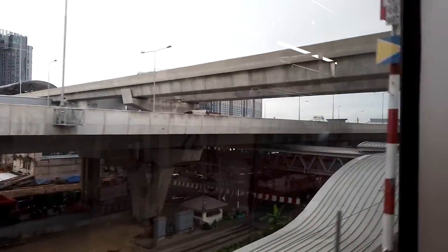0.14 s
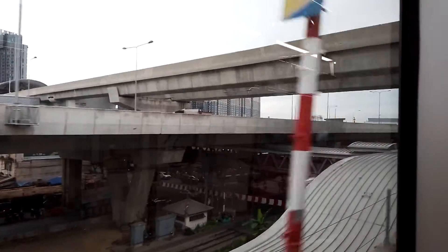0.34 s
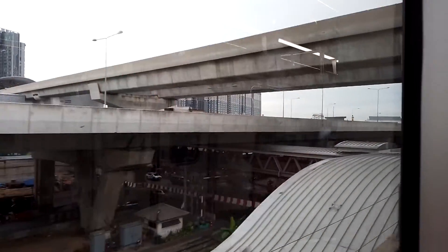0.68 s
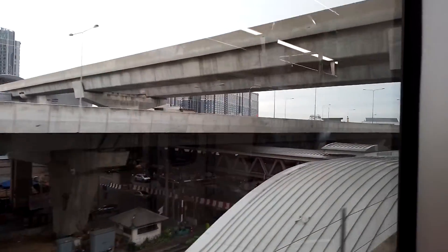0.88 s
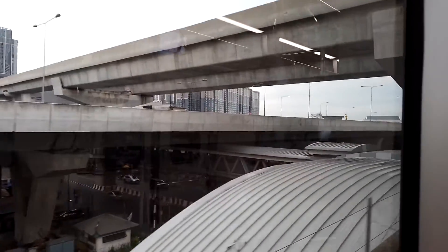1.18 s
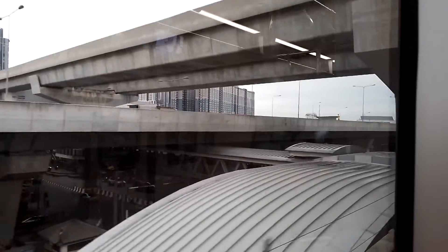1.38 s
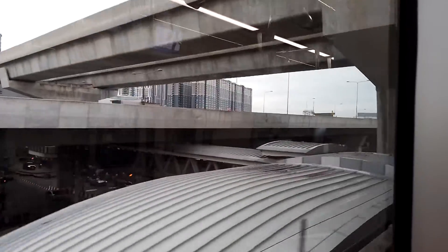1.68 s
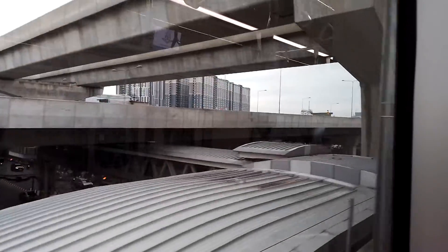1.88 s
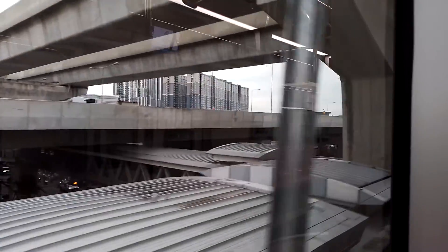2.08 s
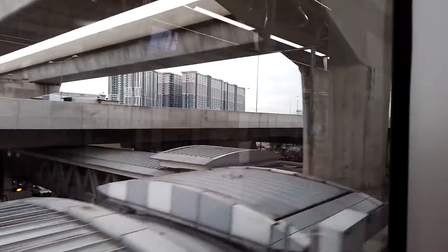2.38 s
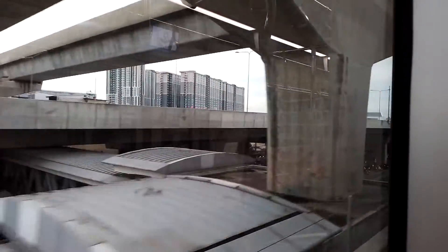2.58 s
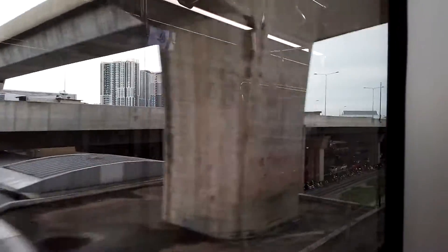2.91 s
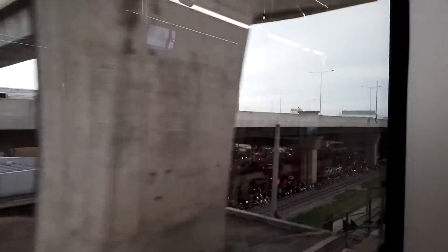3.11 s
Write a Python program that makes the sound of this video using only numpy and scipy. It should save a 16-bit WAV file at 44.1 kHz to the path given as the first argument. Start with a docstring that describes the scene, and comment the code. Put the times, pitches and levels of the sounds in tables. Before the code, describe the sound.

Electric commuter train rolls steadily, wheels roaring dully through the floor, with two air hisses.

```python
"""Wheels roar through the floor from the start: this is inside an electric commuter train on a viaduct. The body
booms, ventilation hisses and the traction gear whines faintly. Air valves blow off twice, first with a
whistle, then sharply; small leaks hiss and fittings tick. Nearly everything is shaped stereo noise under level
curves; only the valve seats ring as sines. The two microphone ports of a phone colour the treble differently."""
import sys
import numpy as np
from scipy import signal
from scipy.fft import rfft, irfft, next_fast_len
from scipy.io import wavfile
from scipy.ndimage import uniform_filter1d, map_coordinates

SR = 44100
rng = np.random.default_rng(int(sys.argv[2]) if len(sys.argv) > 2 else 0)


def undo_db(level):
    """Turn decibels back into plain size, where 20 dB means ten times bigger."""
    steps = np.asarray(level, float) / 20
    return 10 ** steps


def master(y):
    """Save y as 16-bit WAV."""
    cut = np.clip(np.atleast_2d(y).T, -1, 1)
    pcm = np.round(cut * 32767)  # scale
    wavfile.write(sys.argv[1], SR, pcm.astype(np.int16))


N = 143325  # samples, 3.25 s


def unit(x):
    """Scale so that the mean of the channels has rms 1."""
    return x / np.sqrt(np.mean(np.atleast_2d(x).mean(axis=0) ** 2) + 1e-20)


def along(points, hz):
    """Interpolate (Hz, value) points on a log frequency axis."""
    f, v = np.transpose(points)
    return np.interp(np.log(hz + 1), np.log(f + 1), v)


def curves(rows):
    """One value per sample for each column after the time."""
    s, *cols = np.transpose(rows)
    return [np.interp(np.arange(N) / SR, s, c) for c in cols]


def wobble(rate):
    """A smooth random curve with rate knots a second."""
    knots = rng.standard_normal(int(N * rate / SR) + 4)
    return map_coordinates(knots, [np.arange(N) * rate / SR])


def filtered(x, response):
    """Multiply the spectrum of x by a response of frequency."""
    m = next_fast_len(N + 8192)
    return irfft(rfft(x, m) * response(np.fft.rfftfreq(m, 1 / SR)), m)[..., :N]


def shape(spectrum):
    """Gain over frequency from (Hz, dB) points."""
    return lambda hz: undo_db(along(spectrum, hz))


def peaks(table):
    """Gain over frequency of steep resonances, from rows of (Hz, width Hz, dB)."""
    return lambda hz: sum(undo_db(db) / (1 + (2 * (hz - c) / w) ** 2) for c, w, db in table)


def rush(gain, patchy_db):
    """Stereo noise with patches of random gain in time and pitch, nearly the same in both channels in the bass."""
    # How alike left and right are. Each row: frequency in Hz, likeness from 0 to 1.
    alike = [(30, .9), (60, 0.96), (120, 1), (220, 0.85), (420, 0.71), (800, 0.24), (1500, 0.14),
             (11000, 0.13)]
    z = signal.stft(rng.standard_normal((2, N)), nperseg=1024)[2]
    field = rng.standard_normal(z.shape[1:])
    field = uniform_filter1d(field, size=5, axis=0)
    field = uniform_filter1d(field, size=6, axis=1)
    patches = undo_db(patchy_db * field / field.std())
    pair = signal.istft(z * patches, nperseg=1024)[1][:, :N]

    def mid_side_gain(hz):
        side_share = np.tan(np.arccos(np.clip(along(alike, hz), 0, 1)) / 2)
        return gain(hz) * [np.ones_like(hz), side_share]

    mid, side = filtered(pair, mid_side_gain)
    return unit(np.array([mid + side, mid - side]))


def blows(rows):
    """Envelope of air releases: rise, hold, then the carriage lets them die away."""
    t = np.arange(N) / SR
    out = 0
    for s, db, rise, hold, t60 in rows:
        fade_db = -60 * np.clip(t - s - rise - hold, 0, None) / t60
        out = out + undo_db(db + fade_db) * np.clip((t - s) / rise, 0, 1) ** 0.66
    return out


def ventilation():
    """Steady air hiss: broad noise with a slightly unsteady level."""
    # Hiss over time. Each row: time in seconds, level in dB.
    air = [(0.0, -61), (0.78, -61.5), (0.95, -61.5), (1.36, -62.5), (1.72, -61.5), (1.85, -59),
           (2.05, -59.5), (3.25, -58.5)]
    # Colour of the hiss. Each row: frequency in Hz, density in dB per Hz.
    vent = [(900, -27), (1200, -3.5), (1380, -8), (1500, -1.5), (1800, -8.5), (2050, -2.5), (2200, -2.5),
            (2580, -7.5), (2940, -7), (3230, -14), (3940, -13.5), (5430, -21.5), (6370, -17), (6870, -13),
            (7550, -9), (8620, -21), (9600, -19), (10600, -16), (11400, -20.5), (12200, -25), (12700, -33),
            (14200, -34), (15000, -120)]
    air_db, = curves(air)
    return undo_db(air_db + 0.5 * wobble(10)) * rush(shape(vent), patchy_db=1.9)


def gear_whine():
    """Wavering whine of the traction gear: a fuzzy line of narrow noise."""
    # Whine over time. Each row: time in seconds, level in dB before a cut of 2 dB.
    gears = [(0.0, -71), (0.02, -65.5), (0.76, -72), (0.84, -61), (1.21, -74), (1.32, -62), (1.35, -68),
             (1.61, -68), (1.74, -55), (2.27, -68), (2.62, -60), (3.25, -70)]
    # The fuzzy line. Each row: frequency in Hz, width in Hz, gain in dB.
    whine = [(2130, 126, 0)]
    whine_db, = curves(gears)
    return undo_db(whine_db - 2 + 0.57 * wobble(8.1)) * rush(peaks(whine), patchy_db=1.0)


def carriage_body():
    """The floor drums, the body booms and hums deep below: three low noise bands, each with its own level."""
    # Body over time. Each row: time in seconds, floor drumming in dB, body boom in dB, deep hum in dB.
    body = [(0.0, -45, -69, -71), (0.06, -46, -57, -55), (0.15, -47, -57, -65), (0.37, -51.5, -63, -61),
            (0.41, -48.5, -58, -72), (0.59, -44, -59, -49), (0.66, -36.5, -46, -60), (0.71, -42, -53, -66),
            (0.78, -47.5, -57, -54), (0.92, -41.5, -57, -59), (1.0, -47, -68, -56), (1.11, -39, -57, -63),
            (1.16, -41.5, -55, -53), (1.44, -47.5, -58.5, -67), (1.47, -51, -65, -60.5),
            (1.66, -52.5, -64, -69), (1.71, -46.5, -52, -51), (1.82, -53, -63, -72),
            (2.12, -51, -53.5, -62), (2.29, -49, -68, -71), (2.33, -53.5, -65, -62),
            (2.47, -44.5, -55.5, -61), (3.2, -52.5, -59.5, -64), (3.25, -45, -55, -62)]
    # Colours of drumming, boom and hum. Each row: frequency in Hz, density in dB per Hz.
    drum = [(97, -57), (165, -30), (210, -4), (231, 0), (264, 1), (307, -5.5), (350, -6.5), (460, -11),
            (770, -120)]
    boom = [(50, -29), (85, -3), (129, 2), (161, -13.5), (170, -24), (220, -51), (370, -120)]
    hum = [(12, -50), (20, -24), (38, -20), (52, -12), (63, -8), (70, 3.5), (78, -4.5), (90, -4.5),
           (120, -29), (200, -120)]
    drum_db, boom_db, hum_db = curves(body)
    return (undo_db(drum_db + 1.2 * wobble(15)) * rush(shape(drum), patchy_db=0.0)
            + undo_db(boom_db + 1.9 * wobble(15)) * rush(shape(boom), patchy_db=-1.3)
            + undo_db(hum_db + 1.1 * wobble(7.97)) * rush(shape(hum), patchy_db=-2.0))


def wheels():
    """Rolling noise through the floor: a broad roar, its separate upper edge and ringing floor panels."""
    # Rolling over time. Each row: time in seconds, roar in dB, its upper edge in dB.
    roll = [(0.0, -32, -71), (0.02, -36.5, -62.5), (0.78, -38.5, -69.5), (0.81, -36, -51),
            (1.14, -36.5, -50.5), (1.66, -36, -64), (1.86, -35.5, -47.5), (2.53, -34, -57),
            (2.59, -32, -52), (3.25, -35.5, -53.5)]
    # Colours of the roar and of its upper edge. Each row: frequency in Hz, density in dB per Hz.
    roar = [(190, -38.5), (330, -10.5), (355, -13), (383, -4.5), (426, -7.5), (472, -2.5), (527, 1),
            (595, -4), (747, -1.5), (808, -5.5), (895, -5), (1000, -20), (1300, -59.5), (2200, -120)]
    edge = [(850, -28), (950, -0.5), (1080, -4.5), (1150, -16.5), (1220, -53), (1600, -120)]
    # Ringing of floor panels. Each row: frequency in Hz, width in Hz, gain in dB.
    panels = [(389.7, 31, -6), (482.2, 11, -1.5), (531, 27, -0.5), (749, 27, -2.5)]
    panels_db = -10  # against the roar
    roll_db, edge_db = curves(roll)
    return (undo_db(roll_db + 0.41 * wobble(24.79)) * rush(shape(roar), patchy_db=1.0)
            + undo_db(roll_db + panels_db + 1.2 * wobble(2.94)) * rush(peaks(panels), patchy_db=3.5)
            + undo_db(edge_db + 2.3 * wobble(7.6)) * rush(shape(edge), patchy_db=1.0))


def ticks():
    """Fittings tick: short bright noise bursts with a little carriage tail."""
    # Each row: start in seconds, level of the direct burst in dB, top frequency in Hz.
    tick_rows = [(2.63, -49, 14300), (2.83, -49.5, 11200)]
    # Colour of a tick. Each row: frequency in Hz, density in dB per Hz.
    tick_tone = [(2500, -12), (4000, -4), (8000, 5), (13500, -4), (14300, -28)]
    tick_t60_s, room_db, room_t60_s = 0.0038, -10, 0.21
    t, out = np.arange(N) / SR, 0
    for s, db, top_hz in tick_rows:
        direct = undo_db(-60 * np.abs(t - s) / tick_t60_s)
        tail = undo_db(room_db - 60 * np.abs(t - s) / room_t60_s)
        noise = rush(lambda hz: shape(tick_tone)(hz) / (1 + (hz / top_hz) ** 20), patchy_db=0)
        out = out + (t >= s) * undo_db(db) * (direct + tail) * noise
    return out


def leaks():
    """Small air leaks: narrow hisses that fade over from a higher to a lower band, so the pitch sags."""
    # Each row: start in seconds, level in dB, hold in seconds, pitch at the start in Hz.
    leak_rows = [(.41, -68.5, .09, 9600), (.64, -71, .1, 10800), (2.18, -61, 0.013, 10300)]
    sag, sag_s = 0.05, 0.06  # share of the pitch, seconds
    rise_s, t60_s, width_hz = 0.02, 0.37, 650
    t, out = np.arange(N) / SR, 0
    for s, db, hold, hz in leak_rows:
        turn = np.pi / 2 * np.clip((t - s) / sag_s, 0, 1)
        high = rush(peaks([(hz, width_hz, 0)]), patchy_db=0.5)
        low = rush(peaks([(hz * (1 - sag), width_hz, 0)]), patchy_db=0.5)
        sagging = np.cos(turn) * high + np.sin(turn) * low
        out = out + blows([(s, db, rise_s, hold, t60_s)]) * sagging
    return out


def valve_seats():
    """Each valve seat snaps open and rings as a dying sine."""
    # Each row: time of opening in seconds, peak level in dB.
    openings = [(0.801, -48), (1.689, -40)]
    seat_hz, seat_t60_s = 3980, 0.036
    t, out = np.arange(N) / SR, 0
    for s, db in openings:
        ring = np.sin(2 * np.pi * seat_hz * (t - s))
        out = out + (t >= s) * undo_db(db - 60 * np.abs(t - s) / seat_t60_s) * ring
    return out


def air_valves():
    """A broad puff with a whistling pipe, then a sharp jet with a thin whistle; each opens with a bright spit."""
    # Air releases. Each row: start in seconds, level in dB, rise in seconds, hold in seconds,
    # time to fall by 60 dB in seconds.
    puffs = [(.8, -52, 0.0027, 0.016, 0.23), (.805, -48.5, 0.034, 0.037, 0.73)]
    whistles = [(.83, -40, 0.0065, 0.019, 0.78)]
    jets = [(1.684, -32.5, 0.02, 0.039, 0.67)]
    afterwhistle = [(1.85, -70.5, 0.059, 0.081, 0.51)]
    spits = [(.8, -70, 0.0045, 0.025, .05), (1.686, -60, 0.0045, 0.032, .04)]
    # Colours of puff, jet and spit. Each row: frequency in Hz, density in dB per Hz.
    puff_tone = [(900, -40), (1200, 2), (2100, -11), (3100, -1.5), (3930, -3), (5500, -5.5), (7400, -5),
                 (8600, -19), (11400, -13), (11900, -45), (13000, -90), (22000, -120)]
    jet_tone = [(1350, -70), (2300, -33), (3050, -18.5), (3960, -14), (5180, -21), (5650, -13), (6600, -12),
                (7250, -2), (8690, 0.5), (9740, 0.5), (10600, -5.5), (11500, -15.5), (11900, -37),
                (13000, -90), (22000, -120)]
    spit_tone = [(10500, -38), (11800, 8), (13500, -8), (14300, -10), (15000, -120)]
    # Resonances of the whistling pipe and the thin whistle. Each row: frequency in Hz, width in Hz, gain in dB.
    pipe = [(1300, 130, -8), (2655, 320, -3.5), (5070, 400, -8), (7510, 500, -5), (10300, 550, -17)]
    thin = [(4330, 60, 0)]
    layers = [(puffs, shape(puff_tone)), (whistles, peaks(pipe)), (jets, shape(jet_tone)),
              (afterwhistle, peaks(thin)), (spits, shape(spit_tone))]
    return valve_seats() + sum(blows(rows) * rush(gain, patchy_db=2.04) for rows, gain in layers)


def scene():
    """Everything heard in the carriage, from the background to the air valves."""
    return ventilation() + gear_whine() + carriage_body() + wheels() + ticks() + leaks() + air_valves()


def top_cut(x):
    """Nothing passes above the cut-off."""
    return signal.sosfilt(signal.butter(12, 14255, fs=SR, output="sos"), x)


def record(dry):
    """Two microphone ports, each with its own colour; the right one hears a little later."""
    # Colour of the ports. Each row: frequency in Hz, left over right in dB.
    port_rows = [(30, -2), (60, -1), (130, -5.5), (250, -6.5), (450, -4.5), (1000, -1), (2200, -3),
                 (3300, 0), (5000, 3.5), (6500, 8.5), (7500, 18.5), (8400, 2), (9200, -3), (10500, -20),
                 (12000, -10.5), (14000, 2)]
    right_lag_s = 0.0002

    def ports(hz):
        lag = np.exp(1j * np.pi * right_lag_s * np.outer([1, -1], hz))  # half the lag each way
        # the powers of the two gains always add up to 2
        colour = np.sqrt(2 / (1 + undo_db(np.outer([-2, 2], along(port_rows, hz)))))
        return lag * colour

    return top_cut(filtered(dry, ports))


dry = scene()
out = record(dry)
master(out)
```